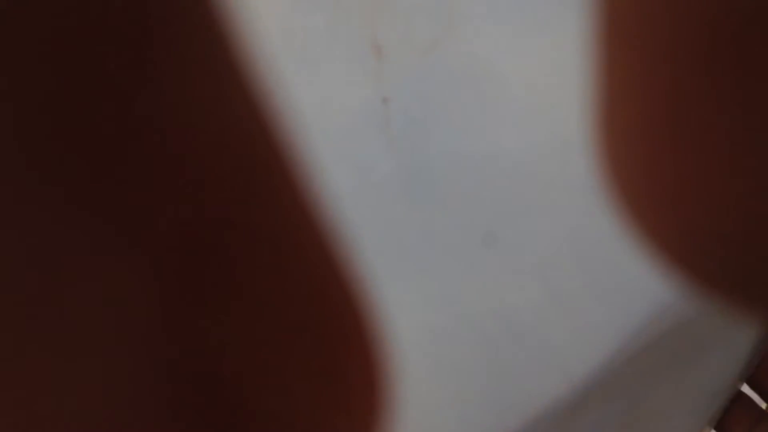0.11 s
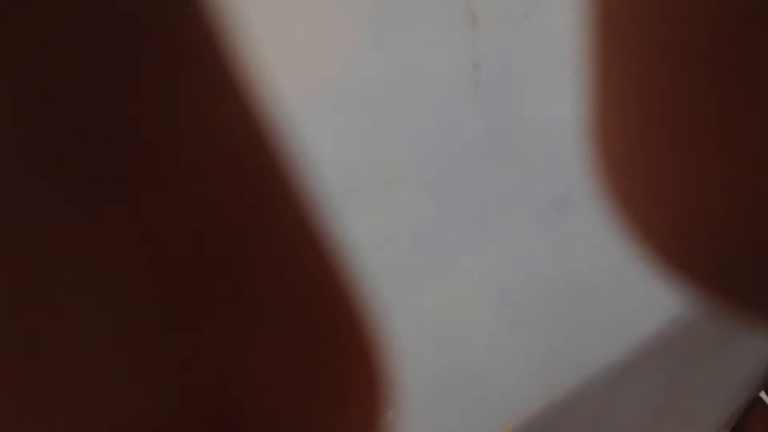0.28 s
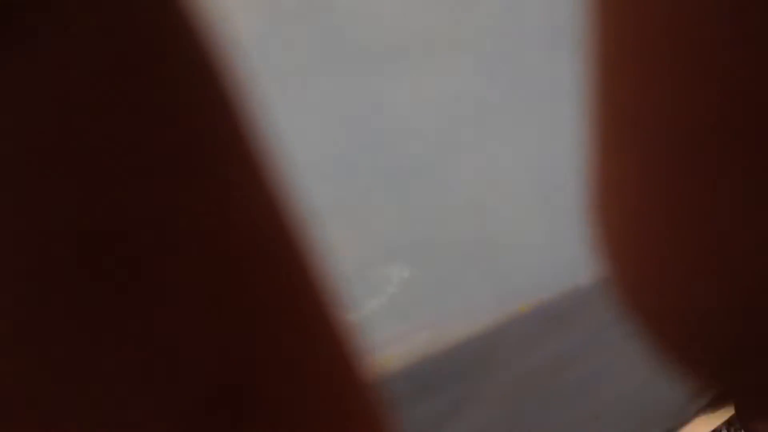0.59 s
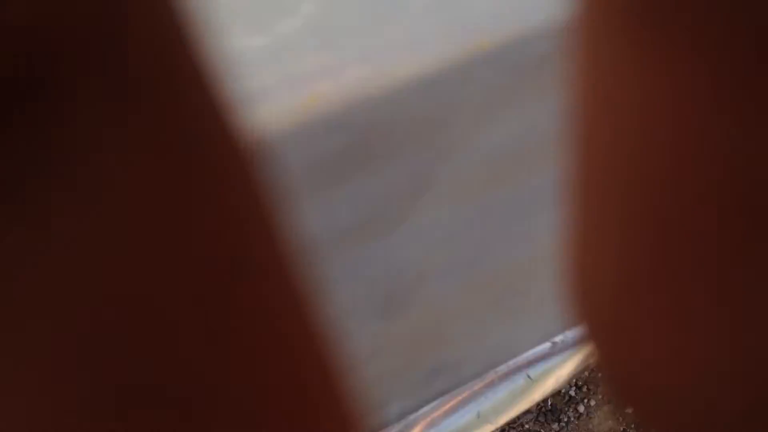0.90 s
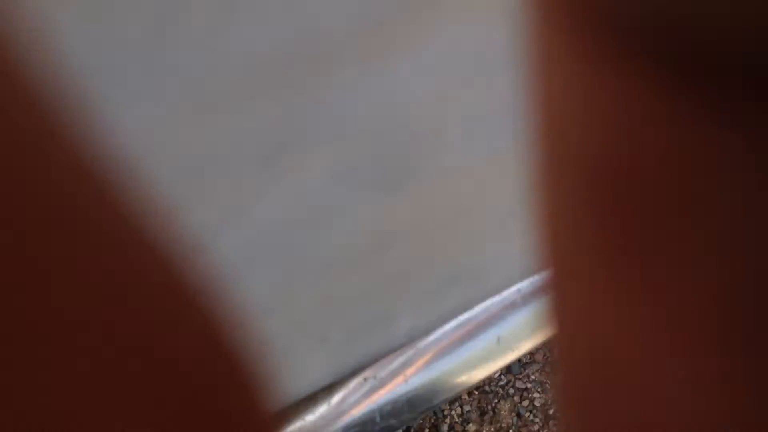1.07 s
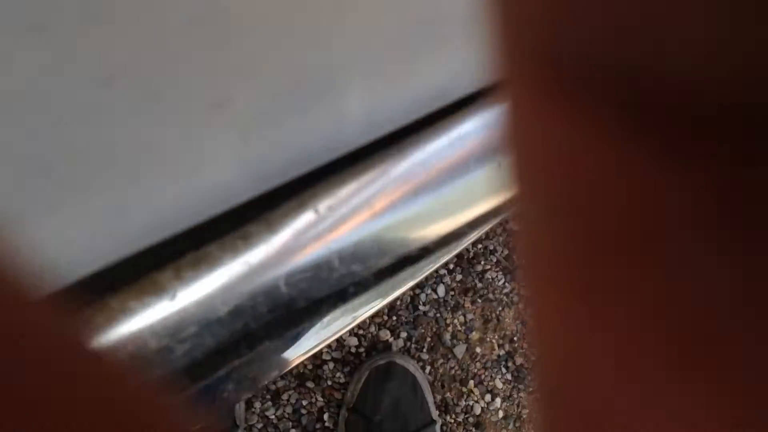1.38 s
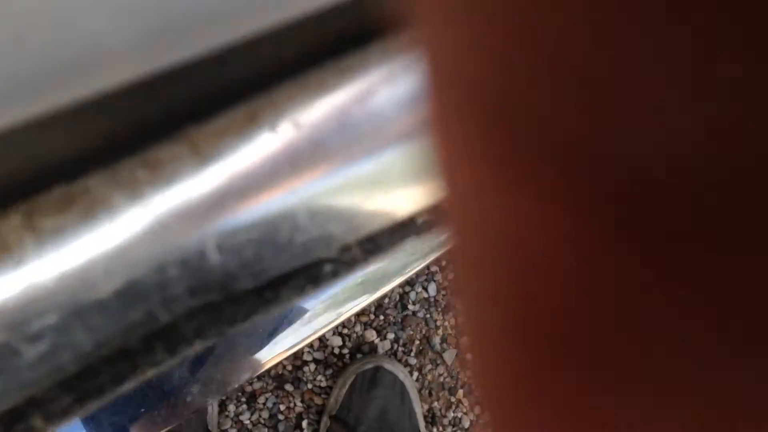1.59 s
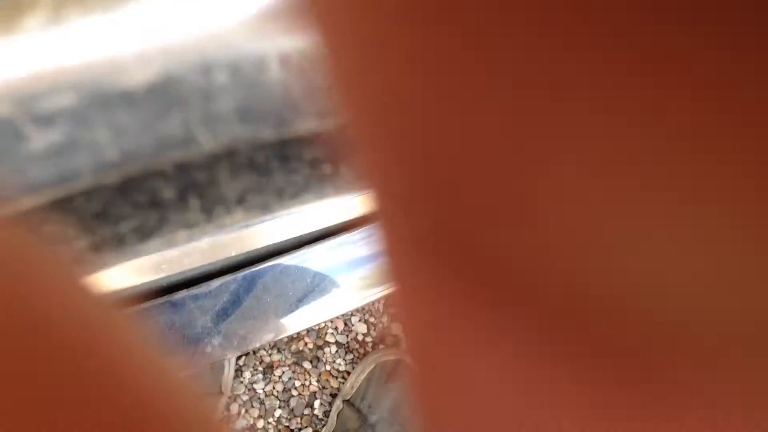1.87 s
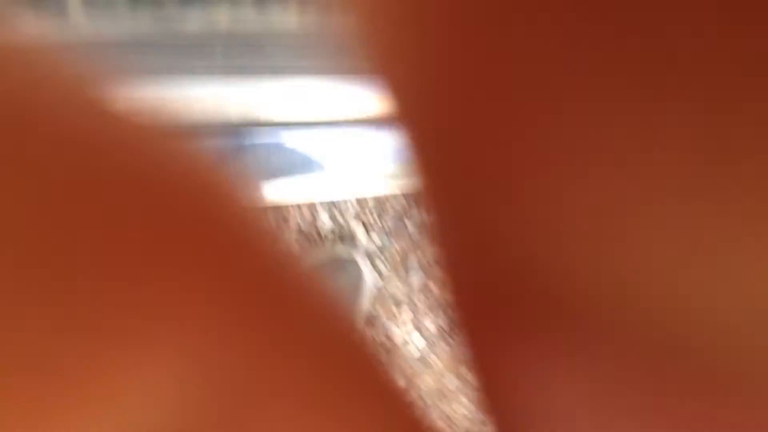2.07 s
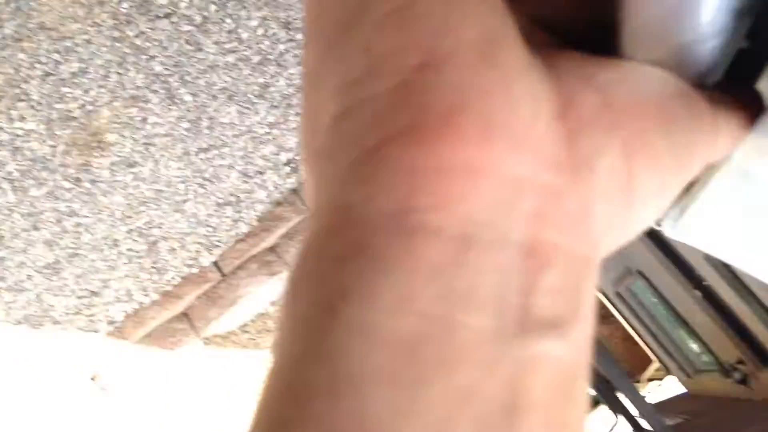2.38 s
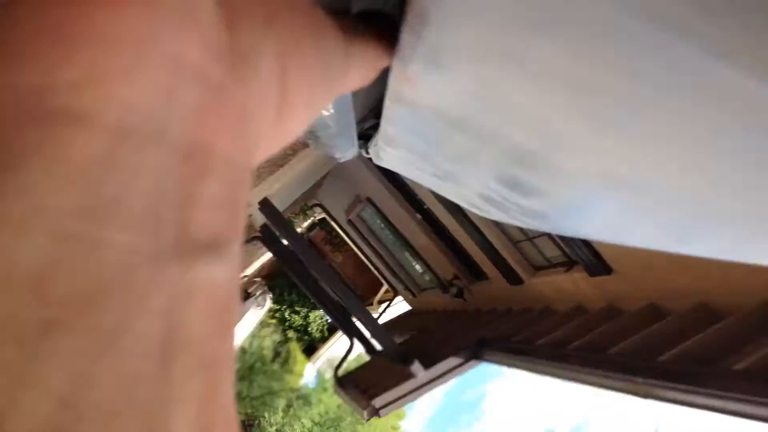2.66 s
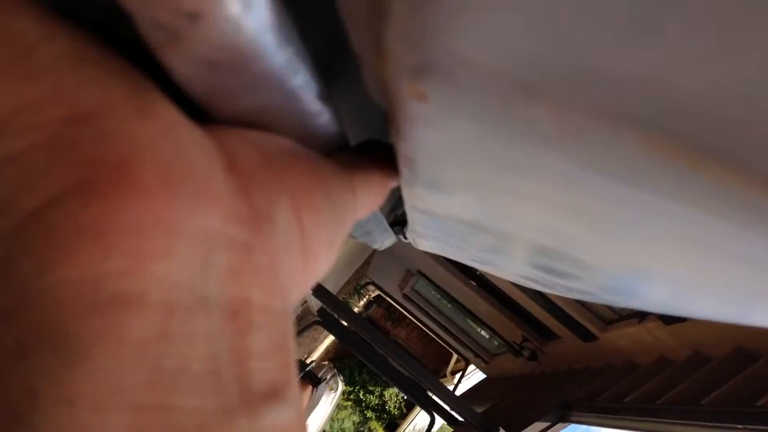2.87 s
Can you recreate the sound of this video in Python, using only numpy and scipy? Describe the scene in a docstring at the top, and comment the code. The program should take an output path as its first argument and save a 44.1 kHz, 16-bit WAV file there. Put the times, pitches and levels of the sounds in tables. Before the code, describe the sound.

Close up in a quiet yard, a truck hood pops with a deep metallic boom and wobble; faint rubbing and ticks follow, then a sharp catch clack, rattling knocks and a final snap starting to scrape.

```python
"""A brush and two small ticks in a quiet yard, then a pickup's hood latch lets go and the panel booms.
The big sheet metal rocks on its stops and settles; a hand brushes along the edge among small ticks.
Then the safety catch is knocked, snaps and starts to slide. Blows are thuds plus ringing modes,
rubbing and yard are shaped noise, ticks are short tone pulses, the slide is grit through resonances.
"""
import sys
import numpy as np
from scipy import signal
from scipy.fft import rfft, irfft, next_fast_len
from scipy.io import wavfile
from scipy.ndimage import uniform_filter1d

SR = 44100
rng = np.random.default_rng(int(sys.argv[2]) if len(sys.argv) > 2 else 0)


def int16_out(signal):
    """Quantize to a 16-bit WAV file."""
    q = np.round(np.clip(np.atleast_2d(signal).T, -1, 1) * 32767)
    wavfile.write(sys.argv[1], SR, q.astype(np.int16))


N = 134505  # length in samples


def amp(db):
    """Decibels to linear gain."""
    return 10 ** (np.asarray(db) / 20)


def unit(x):
    """Scale to rms 1."""
    return x / np.sqrt(np.mean(x ** 2) + 1e-20)


def along(points, hz):
    """Read a curve of (Hz, value) points on a log frequency axis."""
    point_hz, value = np.transpose(points)
    return np.interp(np.log(hz + 1), np.log(point_hz + 1), value)


def filtered(x, response):
    """Filter x by a complex response of frequency, padded so the end does not wrap round."""
    size = next_fast_len(len(x) + 8192)
    spectrum = rfft(x, size) * response(np.fft.rfftfreq(size, 1 / SR))
    return irfft(spectrum, size)[:len(x)]


def add(out, start_s, x):
    """Mix x into out at start_s."""
    part = out[max(round(start_s * SR), 0):][:len(x)]
    part += x[:len(part)]


def peak(hz, centre_hz, width_hz):
    """Response of one causal resonance, gain 1 at its centre."""
    return 1j * hz * width_hz / (centre_hz ** 2 - hz ** 2 + 1j * hz * width_hz)


def patchy_noise(spectrum, patchy_db):
    """Noise of rms 1 whose gain wanders in random patches of time and frequency."""
    z = signal.stft(rng.standard_normal(N + SR), nperseg=512)[2]
    patches = uniform_filter1d(rng.standard_normal(z.shape), size=5, axis=0)  # across frequency
    patches = uniform_filter1d(patches, size=8, axis=1)  # across time
    noise = signal.istft(z * amp(patchy_db * unit(patches)), nperseg=512)[1][:N]
    return unit(filtered(noise, lambda hz: amp(along(spectrum, hz))))


# spectrum of the outdoor hush: (pitch_hz, relative level_db)
YARD_SPECTRUM = [(15, -60.5), (25, -20), (226, -9.5), (288, -14), (661, -28), (736, -24.5), (798, -28),
                 (1370, -25.5), (2210, -33.5), (4330, -38.5), (15300, -47)]
# low rumble of the truck body: (time_s, level_db)
BODY_RUMBLE = [(0, -50.5), (.6, -34), (1.1, -45), (1.5, -53), (2.2, -67), (2.5, -72), (3.05, -61)]
YARD_DB, YARD_PATCH_DB = -51, .8
RUMBLE_HZ, RUMBLE_WIDTH_HZ = 99, 96


def yard():
    """Steady outdoor hush, plus noise through a low resonance whose level wanders as body rumble."""
    hush = amp(YARD_DB) * patchy_noise(YARD_SPECTRUM, YARD_PATCH_DB)
    low = filtered(rng.standard_normal(N), lambda hz: peak(hz, RUMBLE_HZ, RUMBLE_WIDTH_HZ) ** 2)
    time_s, level_db = np.transpose(BODY_RUMBLE)
    rumble_db = np.interp(np.arange(N) / SR, time_s, level_db)
    return hush + amp(rumble_db) * unit(low)


# strokes along the metal: (start_s, length_s before the fade, level_db, extra treble_db)
RUB_STROKES = [(0, 0.019, -46, -5.5), (0.754, 0.034, -49, 1), (0.899, 0.064, -51, -3),
               (0.994, 0.068, -52, -3), (1.08, 0.038, -47, -2.5), (1.128, 0.086, -53.5, -2.5),
               (1.217, .27, -53, 1.5), (1.525, 0.085, -58, 2), (1.696, 0.14, -62, 10),
               (1.984, 0.14, -56.5, 5.5), (2.189, 0.054, -66.5, 16.5), (2.32, 0.098, -58, 9),
               (2.613, 0.076, -54.5, 12), (2.738, 0.15, -57, 11.5)]
# spectrum of the friction noise: (pitch_hz, relative level_db)
RUB_SPECTRUM = [(290, -56), (500, -11), (544, -6.5), (826, -10), (990, -2.5), (1380, -15.5), (1780, -5),
                (2100, -12.5), (3110, -15.5), (4400, -18), (5280, -27), (5900, -25), (6690, -30.5),
                (14000, -36)]
RUB_PATCH_DB, RUB_SPLIT_HZ = 2.2, 4200
RUB_EDGE_S = .022  # fade-out; the fade-in takes a third of it


def rubbing():
    """Patchy friction noise under soft-edged strokes, some brighter than others."""
    t = np.arange(N) / SR
    noise = patchy_noise(RUB_SPECTRUM, RUB_PATCH_DB)
    low = filtered(noise, lambda hz: 1 / (1 + (hz / RUB_SPLIT_HZ) ** 4))
    treble = noise - low
    out = np.zeros(N)
    for start_s, length_s, level_db, treble_db in RUB_STROKES:
        fade_in = 3 * (t - start_s) / RUB_EDGE_S
        fade_out = (start_s + length_s + RUB_EDGE_S - t) / RUB_EDGE_S
        stroke = np.clip(np.minimum(fade_in, fade_out), 0, 1)
        out += amp(level_db) * stroke * (low + amp(treble_db) * treble)
    return out


# single modes left ringing on their own, the first after the hood's bounce at 0.918 s: (start_s, pitch_hz,
# level_db, t60_s)
SINGLE_RINGS = [(0.919, 137.2, -33, 0.87), (.905, 2236, -48.5, 0.16), (1.01, 7000, -55, 0.08),
                (1.02, 5700, -62, 0.11), (1.09, 5700, -57, 0.13), (1.09, 6600, -63, .15),
                (1.09, 8700, -57, 0.074), (1.2, 8640, -59, .08), (1.29, 8600, -78, .08),
                (1.85, 214.7, -40.5, 0.39)]


def pings():
    """Lone decaying sines with a softened onset."""
    out, t = np.zeros(N), np.arange(SR // 2) / SR
    onset = 1 - np.exp(-t / 0.0023)
    for start_s, pitch_hz, level_db, t60_s in SINGLE_RINGS:
        ring = amp(level_db - 60 * t / t60_s) * np.sin(2 * np.pi * pitch_hz * t)
        add(out, start_s, ring * onset)
    return out


# short round ticks: (time_s of the peak, peak level_db, pitch_hz)
ROUND_TICKS = [(.068, -40, 1510), (.08, -35.5, 1430), (1.226, -38, 1200), (1.548, -36.5, 1210),
               (1.669, -28, 1180), (1.7178, -27.5, 1180), (2.017, -43, 1280), (2.915, -38, 1400)]
TICK_CYCLES, TICK_LEAD_S = 1.14, .005  # half-width in cycles of the pitch; time before the peak


def ticks():
    """Each tick is a couple of cosine cycles under a bell-shaped envelope."""
    out, t = np.zeros(N), np.arange(SR // 2) / SR
    for time_s, level_db, pitch_hz in ROUND_TICKS:
        cycles = (t - TICK_LEAD_S) * pitch_hz
        tick = np.exp(-(cycles / TICK_CYCLES) ** 2) * np.cos(2 * np.pi * cycles)
        add(out, time_s - TICK_LEAD_S, amp(level_db) * tick)
    return out


SNAP_S, SNAP_DB, SNAP_T60_S, SNAP_HZ = 3.0075, -22, 0.0033, 5100  # level before the resonance


def snap():
    """One dry snap: a very short noise burst through a broad resonance."""
    out, t = np.zeros(N), np.arange(SR // 2) / SR
    burst = amp(SNAP_DB - 60 * t / SNAP_T60_S) * rng.standard_normal(len(t))
    add(out, SNAP_S, filtered(burst, lambda hz: peak(hz, SNAP_HZ, SNAP_HZ)))
    return out


# resonances of the sliding catch: (pitch_hz, width_hz, relative level_db)
SCRAPE_RESONANCES = [(358, 190, 2), (870, 180, -1), (1520, 140, -1), (1830, 280, -10), (3000, 700, -23.5),
                     (4300, 630, -15), (7040, 1500, -30)]
SCRAPE_S, SCRAPE_RISE_S, SCRAPE_DB = 3.028, 0.017, -32


def scrape():
    """The catch starts to slide: spiky grit noise excites its resonances, swelling in."""
    grit = rng.standard_normal(N) * amp(8 * rng.standard_normal(N))

    def resonances(hz):
        total = 0
        for k, (pitch_hz, width_hz, level_db) in enumerate(SCRAPE_RESONANCES):
            total = total + (-1) ** k * amp(level_db) * peak(hz, pitch_hz, width_hz)  # alternate sign
        return total

    swell = np.clip((np.arange(N) / SR - SCRAPE_S) / SCRAPE_RISE_S, 0, 1) ** 2
    return amp(SCRAPE_DB) * unit(filtered(grit, resonances)) * swell


RISE_S = 0.0017  # time constant of the ring's onset
THUD_WIDTH, THUD_EDGE = 0.45, 8.3  # resonance width and top edge, as multiples of the thud pitch
MODE_GAP_HZ = 12  # average spacing of the packed modes
MODE_SPREAD_DB, BEAT_DB, BEAT_HZ = 1.06, 4, 12  # random level per mode; beat depth and scale of its rate
TAIL_DB, TAIL_LONGER = -25.5, 3.5  # a weaker part of the decay, this many times slower
RATTLE_DB, RATTLE_SAMPLES = 3, 150  # depth and smoothing of the rattle


def clear_modes(modes, t):
    """Distinct resonances of the metal, each decaying while its level beats at a random rate."""
    ring = np.zeros(len(t))
    for pitch_hz, level_db, t60_s in modes:
        start_db = level_db + rng.normal(0, MODE_SPREAD_DB)
        beat_db = BEAT_DB * np.sin(2 * np.pi * BEAT_HZ * rng.uniform(-1.04, 1) * t)
        ring += amp(start_db + beat_db - 60 * t / t60_s) * np.sin(2 * np.pi * pitch_hz * t)
    return ring


def packed_modes(lines, decay):
    """Modes too dense to hear apart, dying band by band with a slow tail and a rattle."""
    wash = irfft(lines * rfft(rng.standard_normal(SR)), SR)
    hz, frame_s, z = signal.stft(unit(wash), SR, nperseg=512)
    fall_db = -60 * frame_s / along(decay, hz)[:, None]
    fall = amp(fall_db) + amp(TAIL_DB + fall_db / TAIL_LONGER)
    wash = signal.istft(z * fall, SR, nperseg=512)[1][:SR]
    rattle = uniform_filter1d(rng.standard_normal(SR), size=RATTLE_SAMPLES)
    return wash * amp(RATTLE_DB * unit(rattle))  # loose parts rattle


def struck(blows, modes, dense, decay, dense_db):
    """Each blow is a short thud plus clear and packed modes; soft contact sounds duller."""
    out, t = np.zeros(N), np.arange(SR) / SR
    grid_hz = np.arange(SR // 2 + 1)
    lines = amp(along(dense, grid_hz)) * (rng.random(len(grid_hz)) < 1 / MODE_GAP_HZ)
    onset = 1 - np.exp(-t / RISE_S)
    click = 1. * (t == 0)
    for start_s, ring_db, hardness_hz, thud_db, thud_hz in blows:
        def contact(hz):
            return 1 / (1 + 1j * hz / hardness_hz) ** 2

        def thump(hz):
            top_edge = 1 / (1 + 1j * hz / (THUD_EDGE * thud_hz))
            return peak(hz, thud_hz, THUD_WIDTH * thud_hz) * top_edge * contact(hz)

        ring = clear_modes(modes, t) / 2 + amp(dense_db) * packed_modes(lines, decay)
        add(out, start_s, amp(ring_db) * filtered(ring * onset, contact))
        thud = filtered(click, thump)
        add(out, start_s, amp(thud_db) * thud / np.abs(thud).max())
    return out


# knocks at the catch: (start_s, relative ring level_db, contact hardness_hz, thud peak_db, thud pitch_hz)
CATCH_KNOCKS = [(2.488, -28, 514, -40, 220), (2.506, -30.5, 4030, -63, 297), (2.511, -26, 4030, -31, 302),
                (2.5147, -16, 8400, -2, 230), (2.525, -32, 7200, -8.5, 256), (2.535, -18, 4000, -11, 400),
                (2.542, -30, 3000, -28, 296), (2.57, -25.5, 3000, -13, 231), (2.6, -42, 3000, -21, 239),
                (2.635, -32, 3000, -29, 250), (2.66, -36, 3000, -18.5, 245), (2.685, -33.5, 2460, -20, 257),
                (2.715, -31.5, 400, -44, 253), (2.75, -26.5, 400, -46, 250), (2.7628, -24, 2310, -11, 330),
                (2.7655, -35.5, 2700, -7, 190), (2.787, -61, 1200, -17, 294),
                (2.817, -35, 1240, -20.5, 310), (2.89, -35, 500, -34, 246), (2.95, -59, 400, -32, 220),
                (3.036, -39.5, 800, -36.5, 350)]
# clear modes of the catch: (pitch_hz, relative level_db, t60_s)
CATCH_MODES = [(155.8, 2, 0.81), (234.7, -6, 0.73), (333, 6.5, 0.12), (436, -6, .26), (512.4, -10, 0.38),
               (646, -7, 0.29), (731, -4.5, 0.088), (858, -3.5, 0.36), (1306.3, -4.5, 0.36),
               (1690, -52, 0.17), (2260, -41, .18), (2260, -19.5, 0.37), (2740, -20, 0.097),
               (3900, -16, 0.091), (5700, -20, 0.056)]
# spectrum of its packed modes: (pitch_hz, relative level_db)
CATCH_PACKED = [(60, -42), (150, -4), (300, -2.5), (605, -14.5), (1300, -15.5), (2300, -20), (2700, -23.5),
                (3100, -28), (4200, -31.5), (5700, -37), (15000, -57)]
# main decay of its packed modes: (pitch_hz, t60_s)
CATCH_FALL = [(100, 0.39), (300, 0.38), (1000, 0.27), (3000, .13), (10000, 0.15)]
CATCH_PACKED_DB = -1.5
CATCH_LOW_HZ = 110  # small parts radiate no deep bass


def safety_catch():
    """Knocks on small metal parts, with the deep bass rolled off."""
    knocks = struck(CATCH_KNOCKS, CATCH_MODES, CATCH_PACKED, CATCH_FALL, CATCH_PACKED_DB)
    return filtered(knocks, lambda hz: (1j * hz / (CATCH_LOW_HZ + 1j * hz)) ** 2)


# blows on the hood: (start_s, relative ring level_db, contact hardness_hz, thud peak_db, thud pitch_hz)
HOOD_BLOWS = [(.18, -45.5, 3000, -39.5, 1500), (.2235, -21, 3000, -5.5, 233), (.231, -23.5, 4050, -15, 233),
              (.238, -19.5, 14000, -6, 231), (.2465, -13.5, 770, -3, 198), (.262, -27, 5000, -9, 220),
              (.325, -22.5, 207, -11, 110), (.41, -29, 400, -30, 200), (.49, -33, 200, -18, 95),
              (.55, -31, 147, -21.5, 95), (.585, -24.5, 118, -19, 82), (.68, -57, 120, -24, 85),
              (.787, -40.5, 194, -34, 140.4), (.85, -37.5, 127, -45, 89), (.918, -32.5, 210, -40, 136),
              (2.11, -38, 200, -57, 143)]
# clear modes of the panel: (pitch_hz, relative level_db, t60_s)
HOOD_MODES = [(58.3, -23, 0.51), (81.64, -1, 0.82), (142.8, -1.5, 1.23), (190, -4, 1.11), (220, 1.5, 0.53),
              (266.3, -18.5, 0.37), (330, -29, 0.81), (400, -9, 0.33), (438, 0.5, 0.27), (465, -7, 0.61),
              (652, -14, .3), (754, -14, 0.3), (875, 2, 0.11), (1090, -2, 0.45), (1667, 5, 0.13),
              (2000, 3, 0.12), (2774, -30, 0.11), (3270, -14, 0.33)]
# spectrum of its packed modes: (pitch_hz, relative level_db)
HOOD_PACKED = [(40, -20), (150, -15), (400, -10), (735, -19), (1110, -21), (1340, -26.5), (1750, -15.5),
               (3410, -22), (6000, -36), (10000, -35), (15000, -47)]
# main decay of its packed modes: (pitch_hz, t60_s)
HOOD_FALL = [(60, 0.43), (200, 0.74), (500, 0.43), (1400, 0.32), (4000, 0.17), (10000, 0.046)]
HOOD_PACKED_DB = -1


def hood_release():
    """The latch lets go: blows boom through the sheet-metal panel as it rocks on its stops and settles."""
    return struck(HOOD_BLOWS, HOOD_MODES, HOOD_PACKED, HOOD_FALL, HOOD_PACKED_DB)


def scene():
    """Sum every layer, from the yard to the hood."""
    background = yard() + rubbing()
    details = pings() + ticks() + snap() + scrape()
    return (background + details + safety_catch() + hood_release())[None]


TOP_HZ = 15450


def record(dry):
    """Nothing is kept above the band limit."""
    return filtered(dry[0], lambda hz: hz < TOP_HZ)[None]


dry = scene()
out = record(dry)
int16_out(out)
```